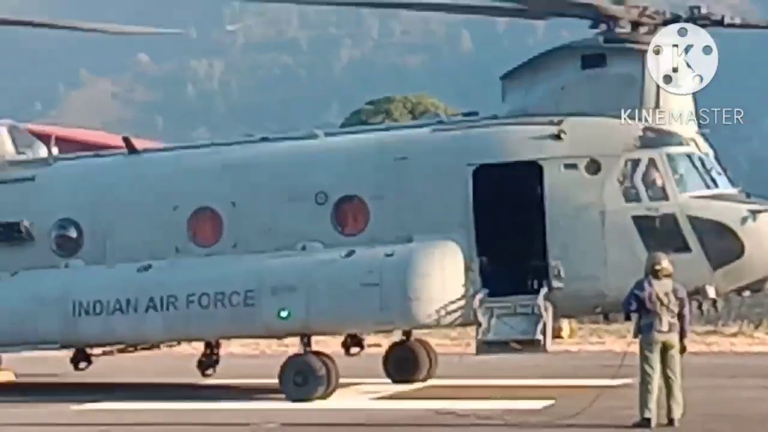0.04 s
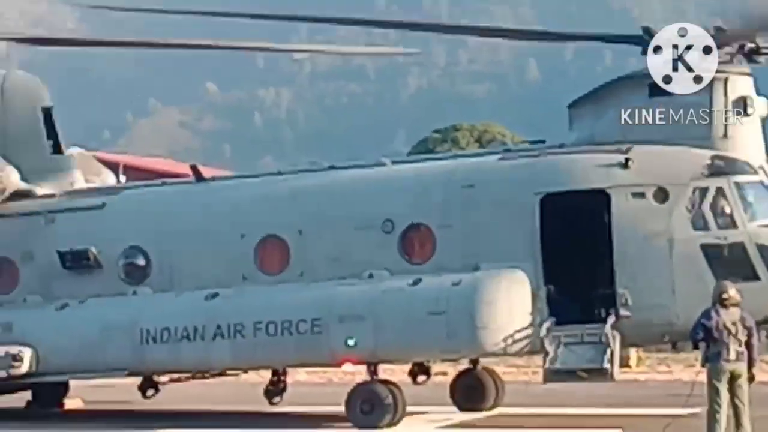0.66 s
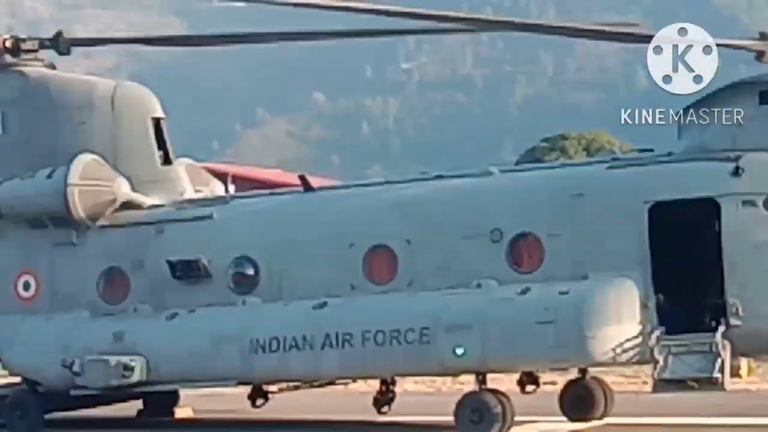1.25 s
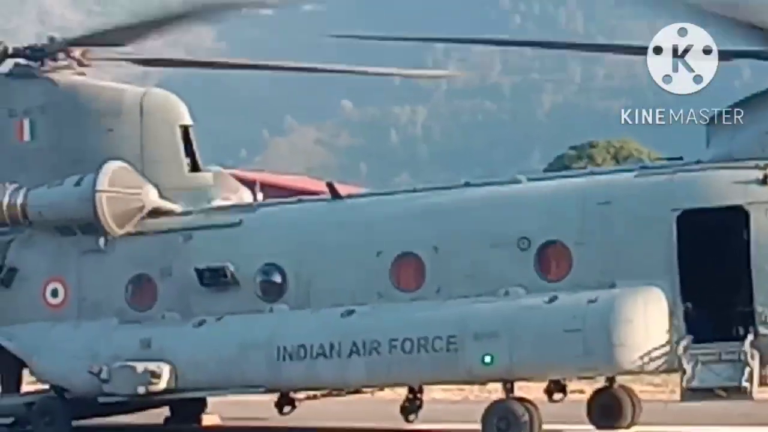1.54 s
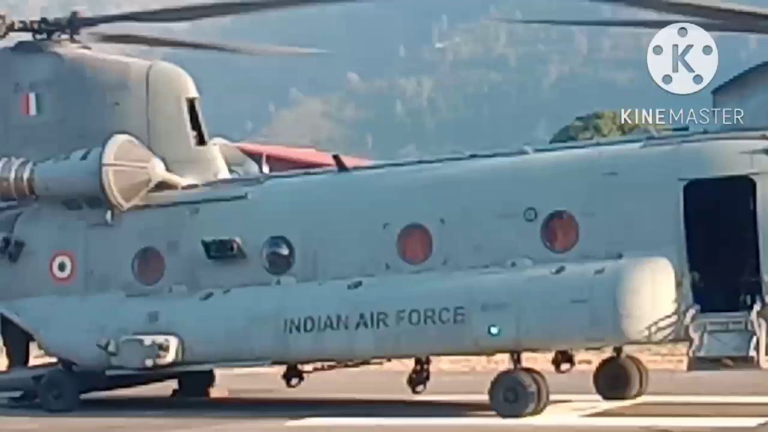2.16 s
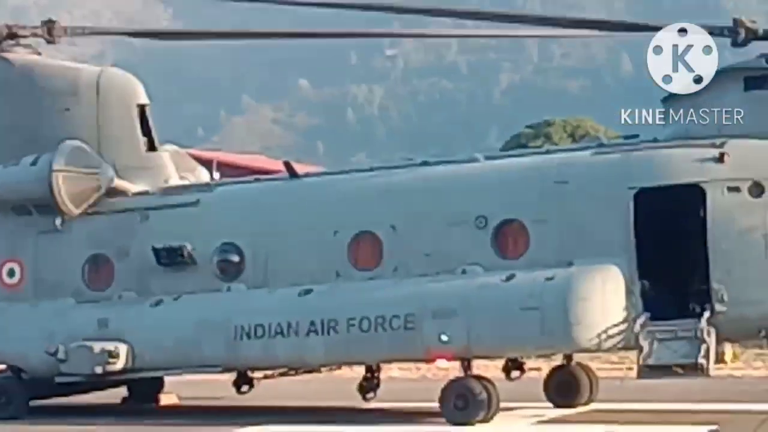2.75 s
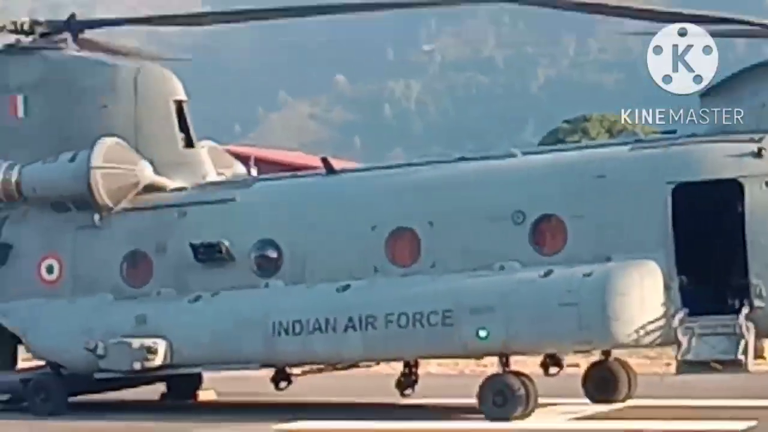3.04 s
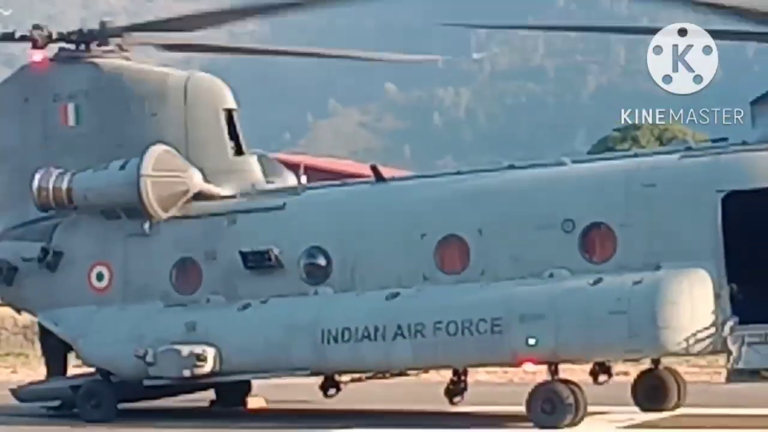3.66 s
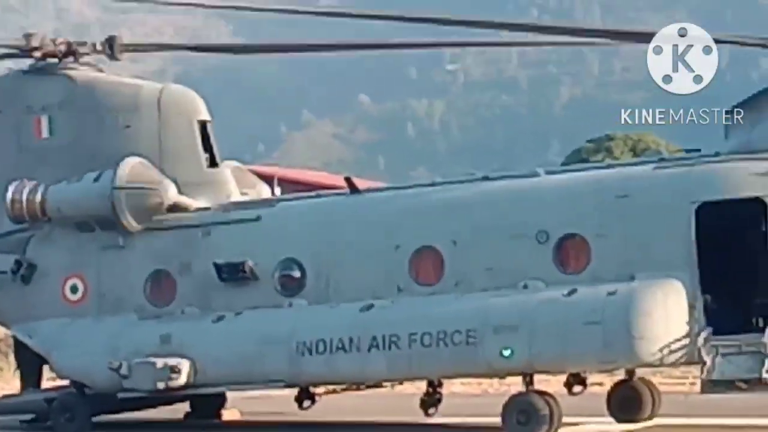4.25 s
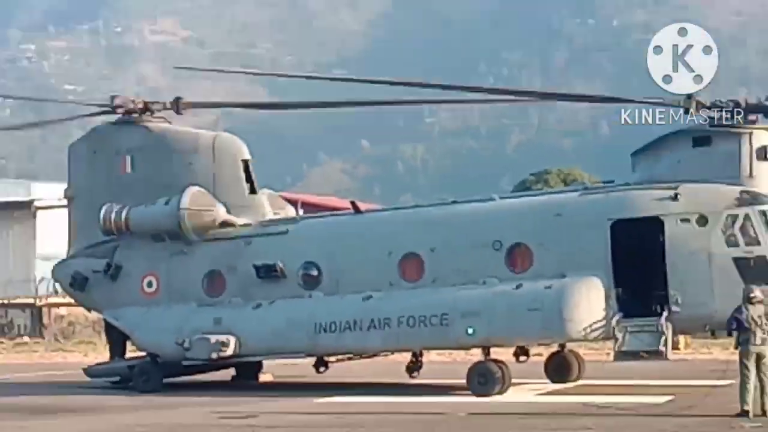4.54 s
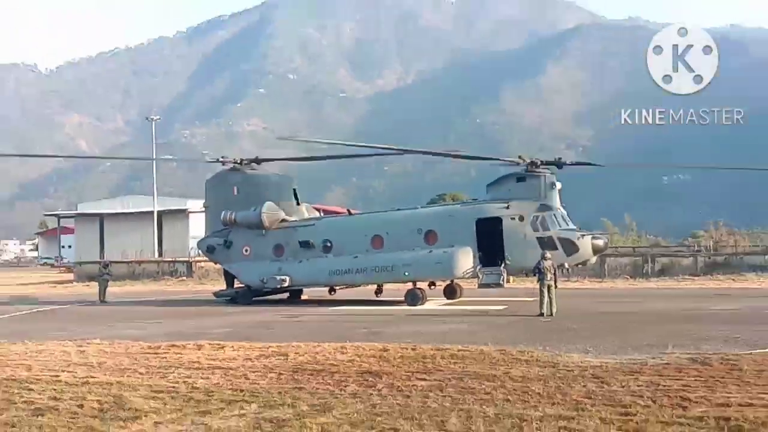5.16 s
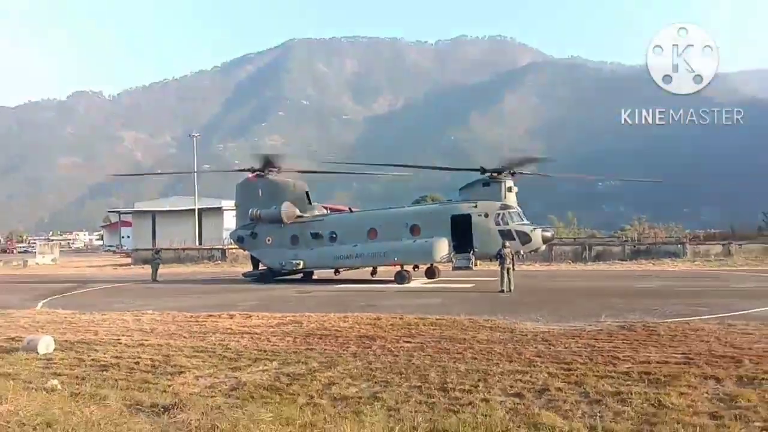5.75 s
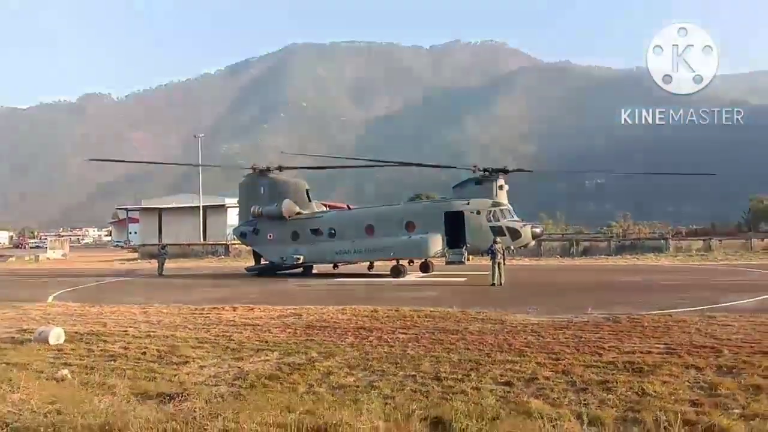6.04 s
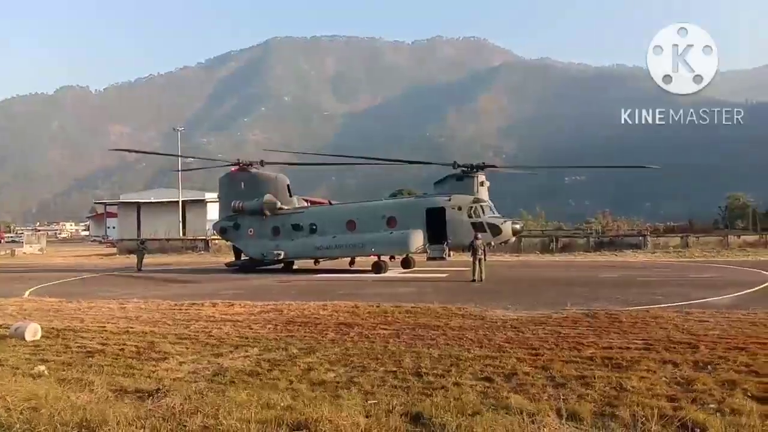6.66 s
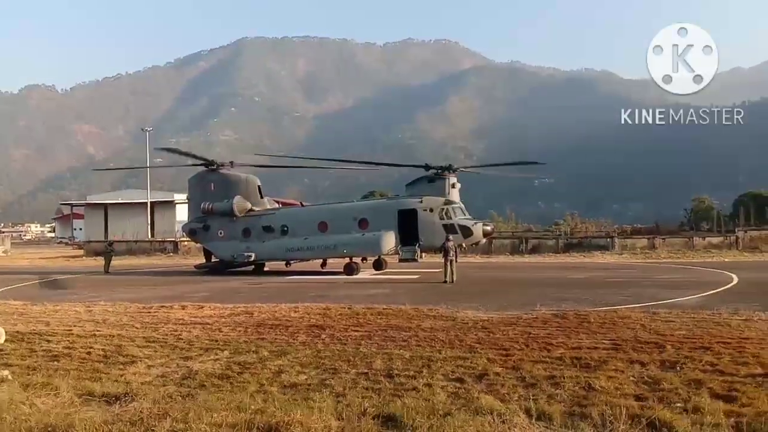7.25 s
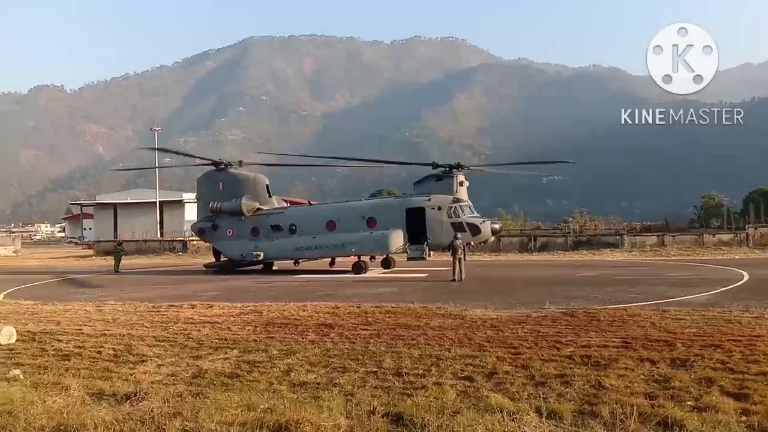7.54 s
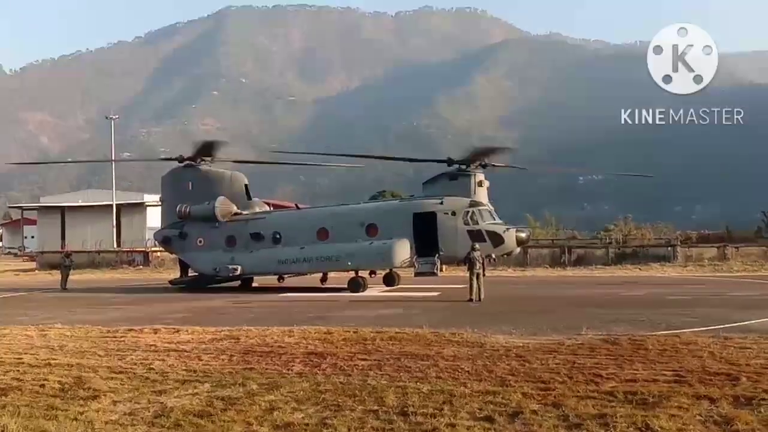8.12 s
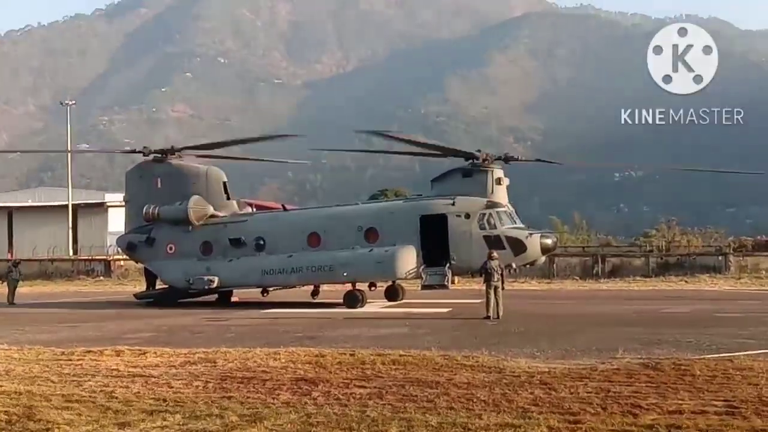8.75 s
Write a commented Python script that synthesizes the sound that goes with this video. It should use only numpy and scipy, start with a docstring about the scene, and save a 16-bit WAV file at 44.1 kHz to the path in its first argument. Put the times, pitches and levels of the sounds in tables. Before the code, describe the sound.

A large twin-rotor helicopter idles on the ground, its high turbine whine and hiss riding over steady blade thumping and exhaust roar.

```python
"""Two turbines whine against each other over the hiss of their intakes: a tandem-rotor helicopter idling
on an open pad, some way off. The blades of both rotors thump and swish in turn, and now and then one
slaps through the wake of another. Underneath, the gearboxes sing and the hot exhaust roars.
One small microphone hears it all and ducks whenever the whine surges."""
import sys
import numpy as np
from scipy import signal
from scipy.fft import rfft, irfft, next_fast_len
from scipy.io import wavfile
from scipy.ndimage import uniform_filter1d

SR = 44100
rng = np.random.default_rng(int(sys.argv[2]) if len(sys.argv) > 2 else 0)


def transcribe(u):
    """Save the signal u as a 16-bit wav file named by the first command-line argument.

    u: samples, shape (n,) or (channels, n), limited to [-1, 1]; the rate is SR.
    q: integer samples, one column per channel.
    """
    v = np.clip(np.atleast_2d(u).T, -1, 1)
    q = np.round(v * 32767).astype(np.int16)
    wavfile.write(sys.argv[1], SR, q)


N = 392048
TIME = np.arange(N) / SR
BLADE_HZ = 11.247

# colour of the turbulence at the blade tips: (frequency [Hz], level [dB])
TIP_SPECTRUM = [(170, 8.5), (290, -3), (400, -0.5), (530, 1.5), (700, -1.5), (950, -2.5), (1400, -12),
                (2200, -33), (4000, -36)]
# swell of the air drawn into the engines: (time [s], level [dB])
INTAKE_SWELL = [(0.0, -2), (0.65, 2), (1.15, -1.4), (1.5, 1.7), (1.9, -1.4), (2.55, 0.7), (3.1, -2.5),
                (3.3, 0.5), (3.45, -1.3), (3.7, 0.1), (5.14, -0.6), (5.64, 1.6), (5.79, -0.6), (6.34, 0.0),
                (6.84, 2.5), (7.09, -1), (7.79, 0), (8.89, -1)]
# swell of the compressor whine: (time [s], level [dB])
WHINE_SWELL = [(0.0, -6.5), (0.4, 6), (1.05, 0.4), (2.85, 3.3), (3.05, -5), (3.3, 1.6), (4.4, -3.5),
               (4.59, 5.5), (4.79, -6.5), (5.59, 3.3), (5.79, -3.5), (6.74, 4.5), (6.99, -2.8), (8.89, -6)]
# how well the moving air carries the top end: (time [s], level [dB])
AIR_CARRY = [(0.0, -3.0), (0.15, -4), (0.5, 7.5), (1.15, -3), (1.3, -3), (2.85, 0.5), (3.05, -7),
             (3.4, 1.8), (3.55, -2.5), (4.69, -2), (4.84, -8), (5.49, -0.4), (5.64, 4.8), (5.79, -8),
             (6.34, -2.5), (6.69, 6), (7.34, -6.5), (8.89, -5)]


def from_db(db):
    """Decibels to gain."""
    return 10 ** (np.asarray(db) / 20)


def rms_one(x):
    """Scale to unit power."""
    return x / np.sqrt(np.mean(x ** 2) + 1e-20)


def level(curve):
    """A dB curve as a gain at every sample."""
    return from_db(np.interp(TIME, *np.transpose(curve)))


def drift(rate):
    """A smooth random wobble of spread 1 that changes about rate times a second."""
    hop, run_in = 40, 2000
    pole = np.exp(-2 * np.pi * hop * rate / SR)
    white = rng.standard_normal(N // hop + run_in + 2)
    slow = signal.lfilter([1], [1, -2 * pole, pole * pole], white)[run_in:]
    return np.interp(np.arange(N) / hop, np.arange(len(slow)), rms_one(slow))


def fading(depth_db, rate):
    """A gain of unit power that swells and sinks at random."""
    return rms_one(from_db(depth_db * np.tanh(drift(rate) / 2) * 2))


def noise(spectrum):
    """Coloured noise of unit power, rolling off at 48 dB an octave past both ends of the spectrum."""
    hz, db = np.transpose(spectrum)
    size = next_fast_len(N)
    octave = np.log2(np.maximum(np.arange(size // 2 + 1) * SR / size, 1))
    outside = np.abs(octave - np.clip(octave, np.log2(hz[0]), np.log2(hz[-1])))
    colour = from_db(np.interp(octave, np.log2(hz), db) - 48 * outside)
    return rms_one(irfft(rfft(rng.standard_normal(size)) * colour, size)[:N])


def resonate(x, hz, width_hz):
    """One resonance with unity gain at its peak."""
    radius = np.exp(-np.pi * width_hz / SR)
    feedback = [1, -2 * radius * np.cos(2 * np.pi * hz / SR), radius ** 2]
    return signal.lfilter(np.array([1, 0, -1]) * (1 - radius ** 2) / 2, feedback, x + 1e-18)


def high_pass(x, hz, order):
    """Roll off everything below hz."""
    return signal.sosfilt(signal.butter(order, hz, "high", fs=SR, output="sos"), x)


def tone(hz, wander_hz, fade_db, fade_rate=6, wander_rate=8):
    """A machine tone of unit power whose pitch and strength waver in the churning air."""
    phase = 2 * np.pi * np.cumsum(hz + wander_hz * drift(wander_rate)) / SR
    return rms_one(np.sin(phase) * from_db(fade_db * drift(fade_rate)))


def blade_gate(offset_s, width_s):
    """A bell-shaped bump, offset_s into every blade period."""
    periods_away = ((TIME - offset_s) * BLADE_HZ + .5) % 1 - .5
    return np.exp(-.5 * (periods_away / BLADE_HZ / width_s) ** 2)


def downwash():
    """The gain that churning air puts on the highs: a dip with each blade, and quick random fading."""
    # dips as a blade of either rotor passes: (offset [s], width [s], depth [dB])
    shadows = [(.010, 0.0095, 4.5), (.056, 0.0094, 2.8)]
    dip_db = sum(db * (1 + 0.66 * drift(4.2)) * blade_gate(s, width) for s, width, db in shadows)
    return from_db(-dip_db) * fading(depth_db=3.5, rate=11.4)


def exhaust(churn):
    """Hot gas makes a mid roar, a brighter rush and a high spray, chopped lightly by the blades."""
    # colours of the three bands of gas noise: (frequency [Hz], level [dB])
    roar_spectrum = [(500, 5.5), (900, -2), (1150, 5), (1450, 7.5), (1620, 6), (1830, 8.5), (2050, 2.5),
                     (2300, -1), (2700, 2), (3100, 9), (4000, 0.5)]
    rush_spectrum = [(2400, -28), (2800, -18), (3000, 5.5), (3200, 7), (3450, 7), (3650, 8), (3900, 6.5),
                     (4500, 5.5), (5000, 6), (6000, -16)]
    spray_spectrum = [(6500, 6.5), (7500, 8), (8200, 1.5), (9000, -0.5), (10000, -8.5), (10700, -11),
                      (11500, -19.5), (13000, -60), (15500, -22)]
    # swells of the roar and the spray: (time [s], level [dB])
    roar_swell = [(0.0, -1), (0.35, 1.0), (3.5, -2.0), (4.35, 2.5), (5.39, -1.1), (5.74, 1), (6.39, -0.8),
                  (6.74, 4), (7.19, -3), (7.54, -0.1), (8.69, 0.4), (8.89, -1)]
    spray_swell = [(0.0, 1.5), (1.3, 3), (1.55, 5.5), (2.1, 0.5), (3.4, 1.5), (7.34, -1.4), (7.54, 1.2),
                   (8.09, -1.1), (8.89, 1)]
    chop = rms_one(1 + 0.32 * blade_gate(0.047, 0.0079)) * from_db(1.47 * drift(35))
    roar = from_db(-30) * level(roar_swell) * noise(roar_spectrum)
    sag_db = 0.1 * (TIME - N / SR / 2)
    rush = from_db(-28.5 - sag_db) * level(INTAKE_SWELL) * noise(rush_spectrum)
    moving_air = level(AIR_CARRY) ** .2 * rms_one(churn ** .25)
    spray = from_db(-33.5) * level(spray_swell) * moving_air * noise(spray_spectrum)
    return chop * (roar + rush + spray)


def gearboxes():
    """Meshing teeth sing in both rotor gearboxes and the engines' accessory gears, over a rough growl."""
    # steady gear and shaft tones: (frequency [Hz], level [dB], wander [Hz])
    shaft_tones = [(1229, -42, 1.2), (1395, -51, 1), (1729, -51, 1), (2024, -50, 1), (2278, -57, 6),
                   (3340, -45, 2), (4052, -51, 6)]
    # colour of the gear growl: (frequency [Hz], level [dB])
    growl_spectrum = [(1050, -23), (1160, -8.5), (1220, -2.5), (1255, 1), (1300, -6.5), (1400, -17.5)]
    # swells of the rotor gearboxes, the accessory gears and the growl: (time [s], level [dB])
    gearbox_swell = [(0.0, 0.3), (0.9, -4), (2.0, 1.7), (2.5, -7.5), (4.45, 3), (5.29, -4.5), (5.84, 5.5),
                     (7.29, -3), (8.04, 5.5), (8.24, -1), (8.74, 5.5), (8.89, -5)]
    accessory_swell = [(0.0, -6), (0.4, 5.5), (0.65, -2.8), (2.4, 2), (2.6, -7), (4.54, 4.5), (5.19, -0.3),
                       (8.69, 0.5), (8.89, -7)]
    growl_swell = [(0.0, -1.5), (1.15, -2.5), (1.6, 4), (1.9, -3), (2.35, 7), (2.55, -6), (2.9, -7),
                   (3.1, 6.5), (3.35, -4), (4.25, 0.5), (5.44, -0.5), (5.74, 6), (7.09, -3.5), (8.89, 3.5)]
    aft = tone(1505.5, wander_hz=.6, fade_db=1)
    front = tone(1450.6, wander_hz=.6, fade_db=1)
    accessory = from_db(-1.5) * tone(1772, wander_hz=1, fade_db=2) + tone(1786, wander_hz=1, fade_db=2)
    upper = tone(3572, wander_hz=8, fade_db=4.5, fade_rate=18, wander_rate=15)
    upper += tone(3586, wander_hz=14, fade_db=3, fade_rate=12)
    shafts = sum(from_db(db) * tone(hz, wander, fade_db=3, fade_rate=12)
                 for hz, db, wander in shaft_tones)
    growl = noise(growl_spectrum) * from_db(1.5 * drift(10))
    gears = [from_db(-40.5) * level(gearbox_swell) * aft,
             from_db(-44.5) * level(gearbox_swell) * front,
             from_db(-42.5) * level(accessory_swell) * accessory,
             from_db(-39) * level(WHINE_SWELL) ** 0.27 * upper,
             from_db(-36.5) * level(growl_swell) * growl]
    # each layer fades on its own way through the air
    return sum(gear * fading(depth_db=2.3, rate=3) for gear in gears) + from_db(-1) * shafts


def thumps(load, uneven_db):
    """Every blade sends the same few pressure pulses; the rotors' overlap beats hardest under load."""
    # pulses in one blade period: (offset [s], level [dB], ring [Hz], bandwidth [Hz], load exponent)
    pulses = [(0.0399, -6.5, 366, 150, 0), (.039, -2.5, 180, 85, -0.5), (0.047, 5, 98, 37, 1),
              (.056, -2, 140.5, 40, 1.5), (.086, -8, 233, 134, -0.5)]
    passes = np.arange(int(N / SR * BLADE_HZ)) / BLADE_HZ
    beat = np.zeros(N)
    for offset, db, hz, width_hz, growth in pulses:
        clicks = np.zeros(N)
        at = np.clip(((passes + offset) * SR).astype(int), 0, N - 1)
        clicks[at] = load[at] ** growth * from_db(uneven_db * rng.standard_normal(len(at)))
        ring = resonate(resonate(clicks, hz, width_hz), hz, 2 * width_hz)
        beat += from_db(db) * rms_one(ring)
    return rms_one(high_pass(beat, hz=72.5, order=4))


def slaps(rasp_db, crack_db, decay_s, top_hz):
    """A blade cuts a tip vortex: a crack with a short rasp behind it, dulled by distance above top_hz."""
    # vortex strikes: (time [s], relative level [dB])
    strikes = [(0.412, -10), (0.943, -11), (1.122, -12.5), (2.275, -18), (2.367, -7.5), (2.458, -10),
               (2.99, -19), (3.081, -11), (4.145, -18), (4.324, -11), (4.5, -5.5), (4.77, -11.5),
               (5.212, -7.5), (5.391, -5.5), (7.173, -11), (7.617, -15), (7.879, -18), (7.968, -8.5),
               (8.591, -9), (8.682, -9), (8.768, -4.5), (8.858, -12)]
    clicks = np.zeros(N)
    for s, db in strikes:
        clicks[int(s * SR)] = from_db(db)
    tails = signal.lfilter([1], [1, -np.exp(-1 / (decay_s * SR))], clicks + 1e-18)
    rasp = tails * noise(TIP_SPECTRUM)
    crack = resonate(resonate(clicks, hz=550, width_hz=155), hz=487, width_hz=960)
    crack *= clicks.max() / np.abs(crack).max()
    slap = from_db(rasp_db) * rasp + from_db(crack_db) * crack
    return signal.sosfilt(signal.butter(2, top_hz, fs=SR, output="sos"), slap)


def rotors():
    """The blades drone, thump, push a low wash and swish at the tips; all but the drone track the load."""
    # blade load as the rotors meet each other's wake: (time [s], level [dB])
    blade_load = [(0.0, -2), (0.15, 1.8), (0.6, -2), (1.0, 3.5), (1.35, -0.2), (2.85, -0.1), (3.05, 2.9),
                  (3.7, -3.2), (4.1, 2), (4.74, -1), (5.49, 2.5), (5.64, -1.7), (6.04, 0.9), (6.84, -1.5),
                  (7.24, 0.3), (8.29, -4), (8.69, 3), (8.89, 0.3)]
    # lowest rotor harmonics: (multiple of the blade rate, level [dB])
    harmonics = [(4, -65), (5, -48), (8, -37), (10, -53)]
    # bursts of turbulence in one blade period: (offset [s], width [s], level [dB])
    swishes = [(.001, 0.0044, 1.5), (0.039, 0.0078, 4), (0.059, 0.0057, 9.5)]
    # colour of the low wash of air: (frequency [Hz], level [dB])
    wash_spectrum = [(20, -37), (40, -31), (60, -15), (85, -0.5), (115, 5.5), (170, -3), (230, -4.5),
                     (300, -12.5), (450, -27)]
    load = level(blade_load)
    phase = 2 * np.pi * BLADE_HZ * TIME
    drone = sum(from_db(db) * np.sin(k * phase + rng.uniform(0, 2 * np.pi)) for k, db in harmonics)
    drone *= from_db(.4 * (TIME - N / SR / 2))  # creeps forward at 0.4 dB a second
    bursts = sum(from_db(db + 1.9 * drift(4.1)) * blade_gate(s, width) ** 2 for s, width, db in swishes)
    beat = from_db(-34) * thumps(rms_one(load), uneven_db=1)
    wash = from_db(-31) * rms_one(1 + blade_gate(0.05, 0.026)) * noise(wash_spectrum)
    tip_gain = load ** 0.19 * fading(depth_db=0.44, rate=6.4) * rms_one(np.sqrt(1 + bursts ** 2))
    tips = from_db(-32) * tip_gain * noise(TIP_SPECTRUM)
    return drone + load * (beat + wash) + tips


def compressors(churn):
    """Two compressors at slightly different speeds beat; the downwash smears their tone into a skirt."""
    # compressor blade rate of the louder engine: (time [s], frequency [Hz])
    spool = [(0, 6574), (2.5, 6576), (3.1, 6580), (4.0, 6575), (6.7, 6575), (7.2, 6592), (7.8, 6576),
             (8.89, 6566)]
    # scattered noise around the whine: (frequency [Hz], level [dB])
    skirt_spectrum = [(6250, -30), (6450, -10), (6505, -1), (6590, 0), (6640, -3), (6720, -15), (6900, -30)]
    pitch = np.interp(TIME, *np.transpose(spool))
    louder = tone(pitch, wander_hz=13, fade_db=2.8, fade_rate=35, wander_rate=30)
    softer = tone(pitch + 14, wander_hz=18, fade_db=2, fade_rate=12, wander_rate=20)
    pair = rms_one(louder + from_db(-7) * softer)
    return rms_one(churn * (pair + from_db(-4.5) * noise(skirt_spectrum)))


def turbines(churn):
    """The compressors whine over hissing intakes, with a chirping whistle below and a fizz on top."""
    # colours of the intake hiss and the top fizz: (frequency [Hz], level [dB])
    hiss_spectrum = [(4400, -28), (4700, -16), (4850, -11), (5100, -8), (5300, -4), (5550, -2.5),
                     (5900, -1), (6400, 0), (6700, -1.5), (7000, -5), (7400, -13.5), (7900, -25),
                     (9000, -45)]
    fizz_spectrum = [(10000, -22), (11500, -13), (12600, -8), (13000, -4), (13180, 0), (13400, -6),
                     (13950, -10), (14400, -4), (14650, 0), (14950, 1), (15500, -1)]
    # swell of the lower whistle: (time [s], level [dB])
    whistle_swell = [(0, -2), (3.0, -2), (4.9, 2), (6.5, 0), (8.89, 3)]
    whine_gain = from_db(-17) * level(WHINE_SWELL) ** 0.83
    hiss_gain = from_db(-16) * level(INTAKE_SWELL) ** 1.55
    whine = whine_gain * compressors(churn)
    # each passing blade disturbs the air drawn into the intakes
    flutter = rms_one(1 + 0.62 * blade_gate(0.049, 0.0032) + 0.16 * blade_gate(0.072, 0.018))
    hiss = hiss_gain * flutter * noise(hiss_spectrum) * from_db(1.73 * drift(40))
    whistle = tone(5358, wander_hz=14, fade_db=3, fade_rate=14, wander_rate=20)
    chirps = from_db(-30) * level(whistle_swell) * rms_one(flutter ** 2.5 * whistle)
    # the fizz flares with the momentary power of whine and hiss
    power = uniform_filter1d((whine + hiss) ** 2, 64, mode="reflect")
    flare = rms_one((power / (whine_gain ** 2 + hiss_gain ** 2)) ** .7)
    fizz = from_db(-41.5) * flare * noise(fizz_spectrum)
    octave = from_db(-55) * rms_one(high_pass((whine / whine_gain) ** 2, hz=9000, order=4))
    return whine + hiss + chirps + level(AIR_CARRY) * (fizz + octave)


def limiter(x, threshold_db, window_s):
    """Fast gain control: when the whine surges, everything ducks."""
    step = 1 / (window_s * SR)
    power = signal.filtfilt([step], [1, step - 1], x[0] ** 2, padtype="even")
    return x / (1 + (power / from_db(threshold_db) ** 2) ** 2) ** (1 / 4)


def scene():
    """The whole helicopter, alike in both channels."""
    churn = downwash()
    blades = rotors() + slaps(rasp_db=-12, crack_db=-7, decay_s=0.0084, top_hz=950)
    return np.tile(blades + gearboxes() + turbines(churn) + exhaust(churn), (2, 1))


def record(dry):
    """Surges are held down, the highest peaks are rounded and the top is cut."""
    ceiling, cutoff_hz = .85, 15480
    held = from_db(0.5) * limiter(dry, threshold_db=-12, window_s=0.00092)
    rounded = held / (1 + (held / ceiling) ** 6) ** (1 / 6)
    return signal.sosfilt(signal.ellip(12, .1, 80, cutoff_hz, fs=SR, output="sos"), rounded)


dry = scene()
out = record(dry)
transcribe(out)
```